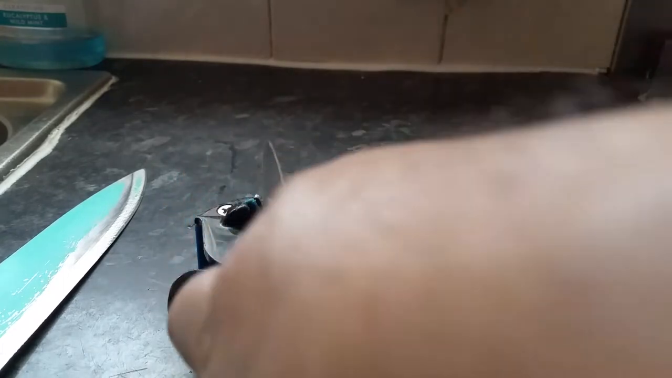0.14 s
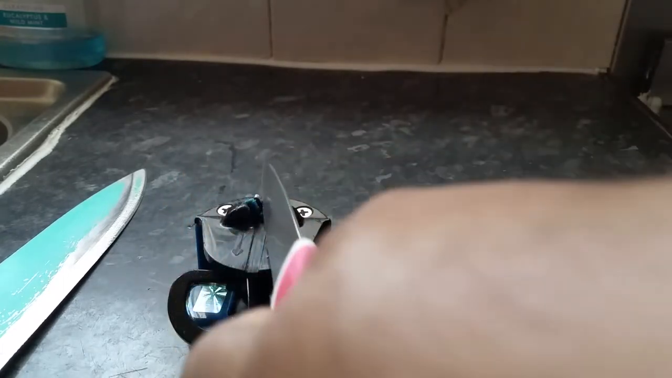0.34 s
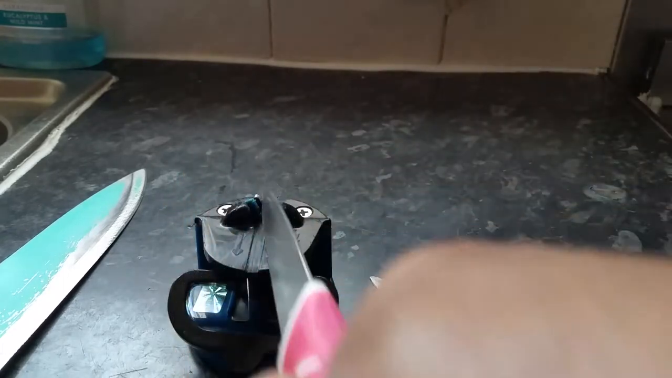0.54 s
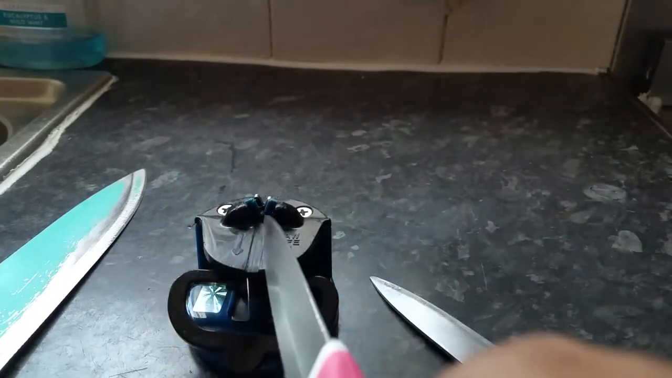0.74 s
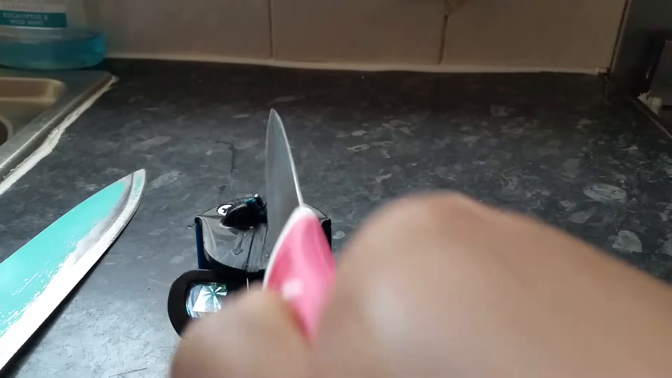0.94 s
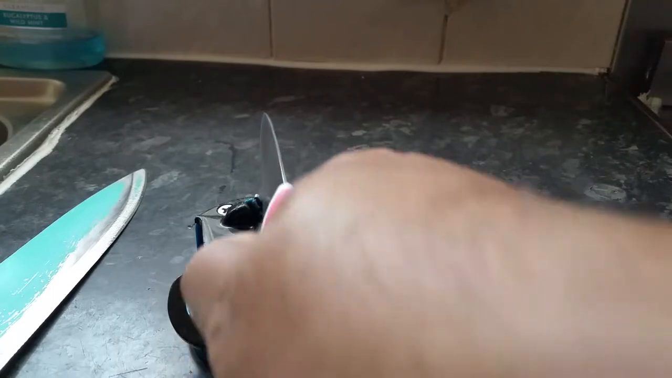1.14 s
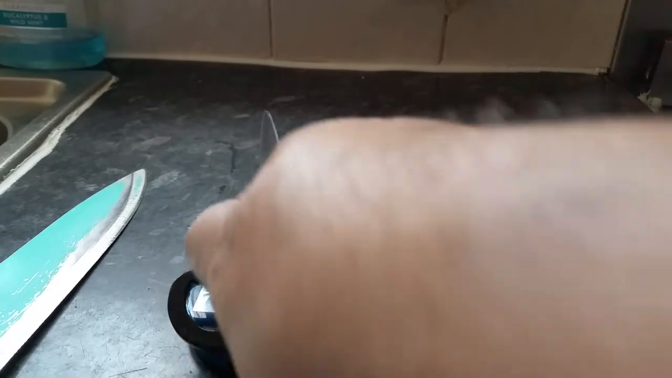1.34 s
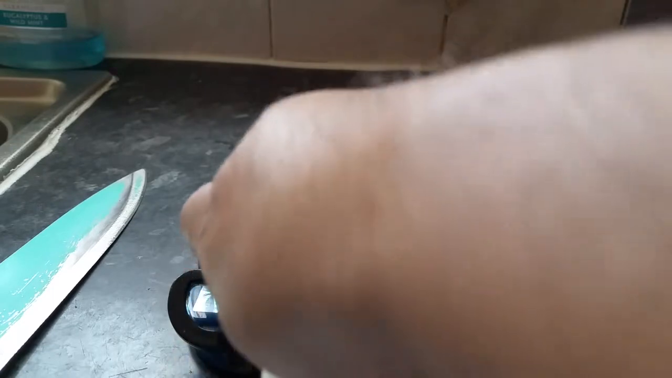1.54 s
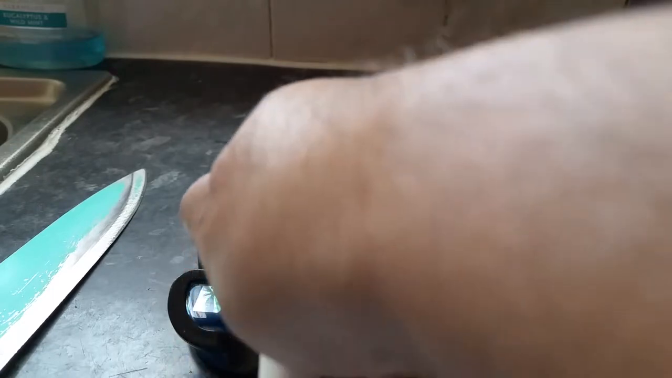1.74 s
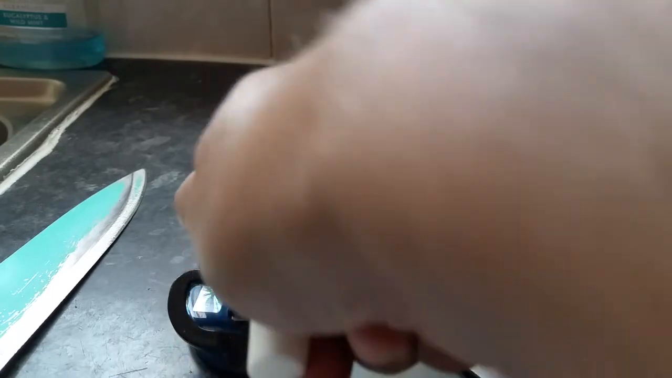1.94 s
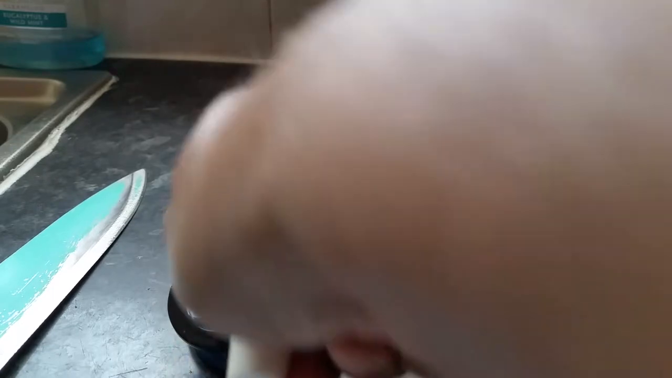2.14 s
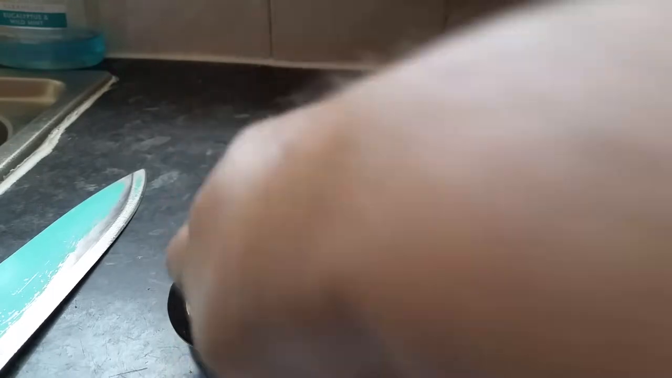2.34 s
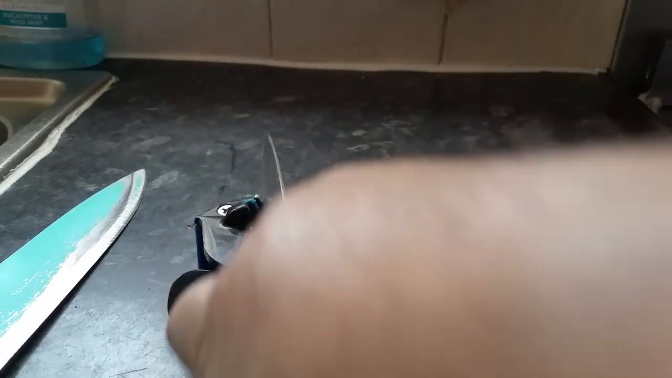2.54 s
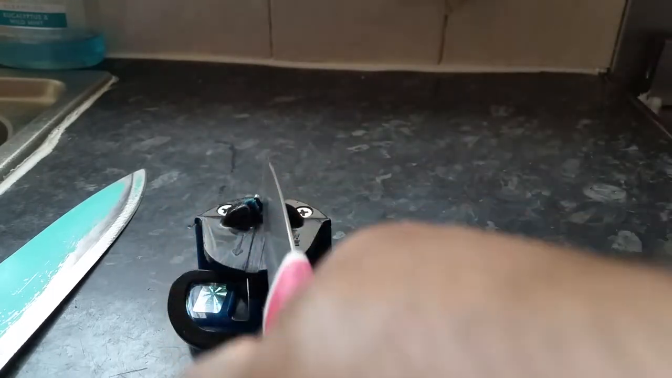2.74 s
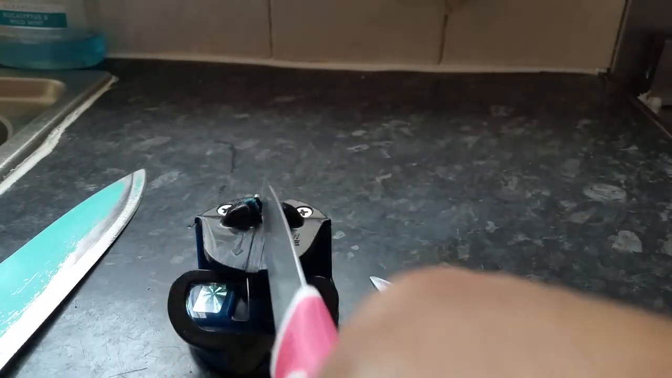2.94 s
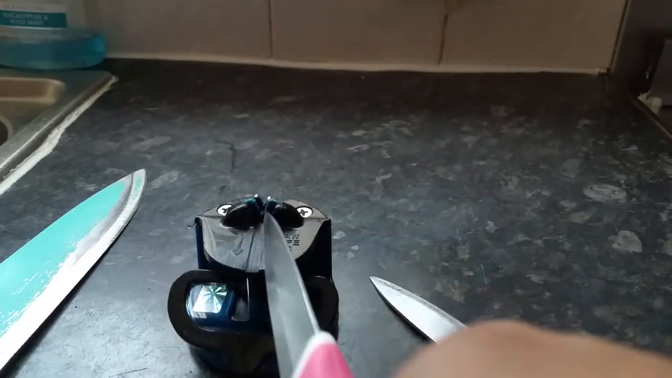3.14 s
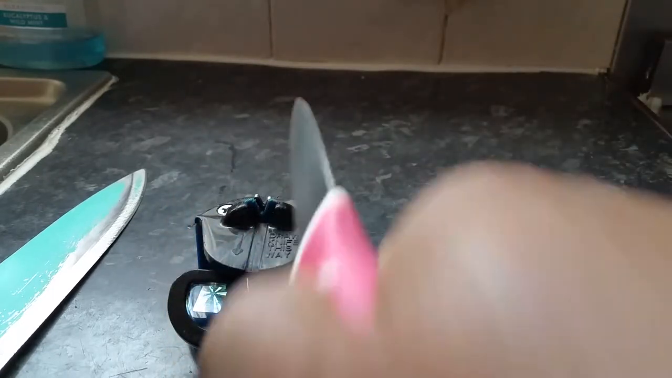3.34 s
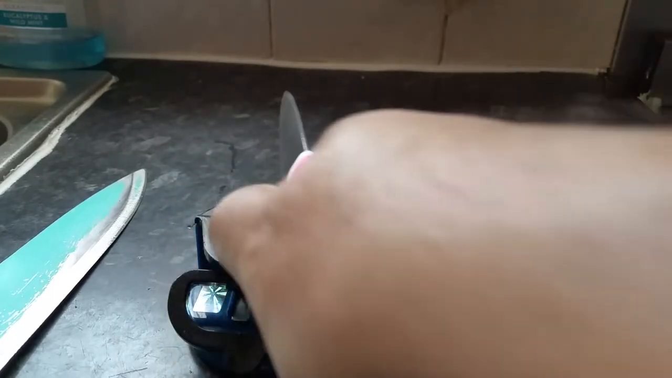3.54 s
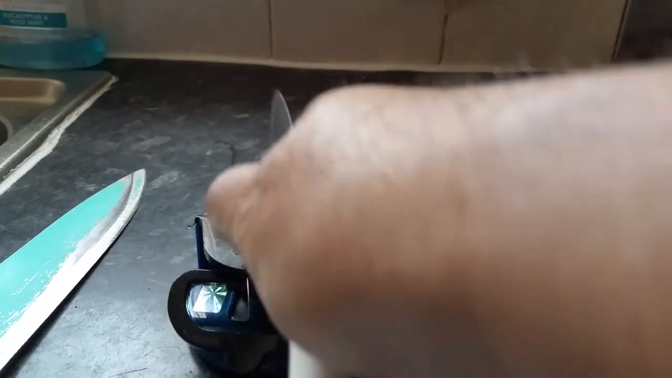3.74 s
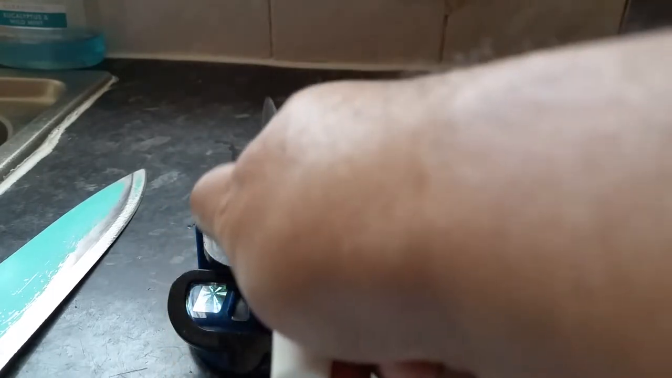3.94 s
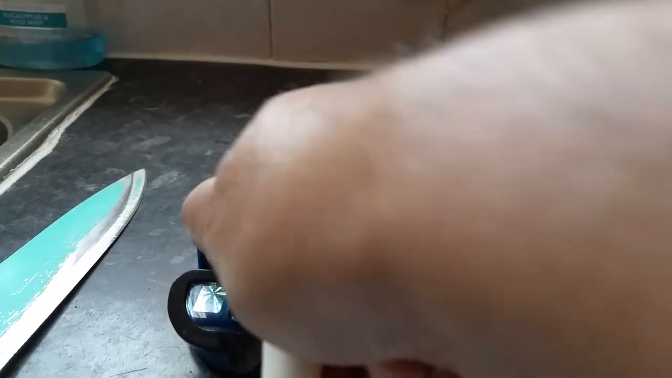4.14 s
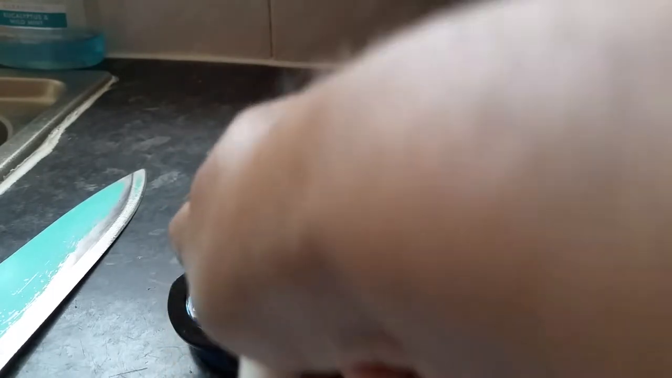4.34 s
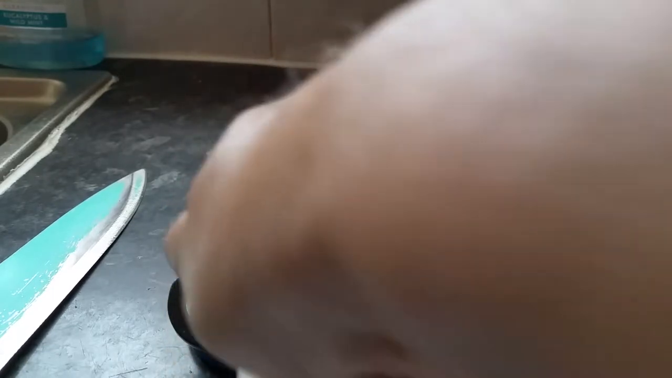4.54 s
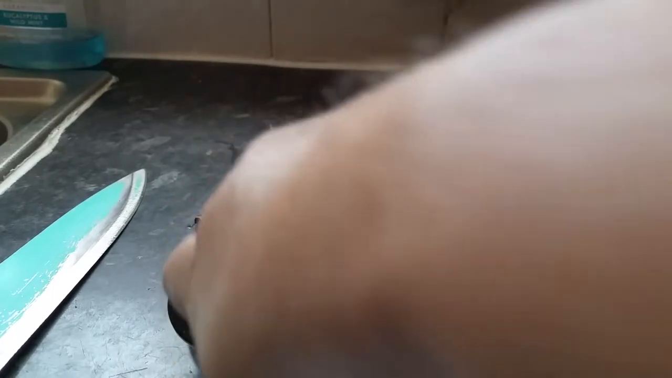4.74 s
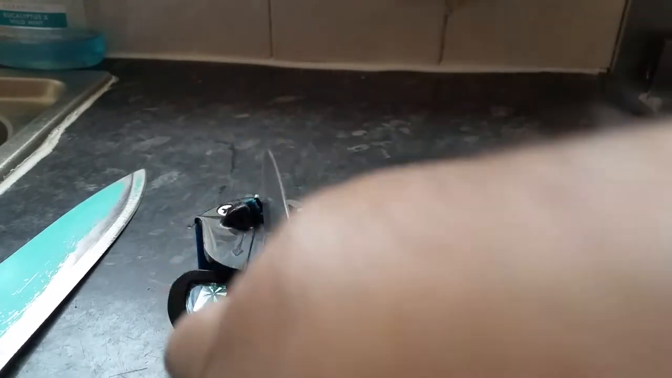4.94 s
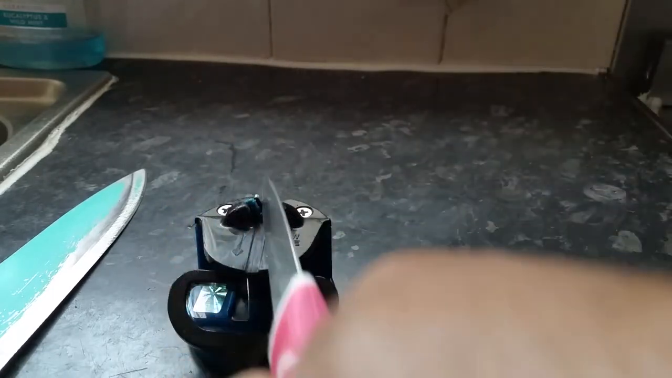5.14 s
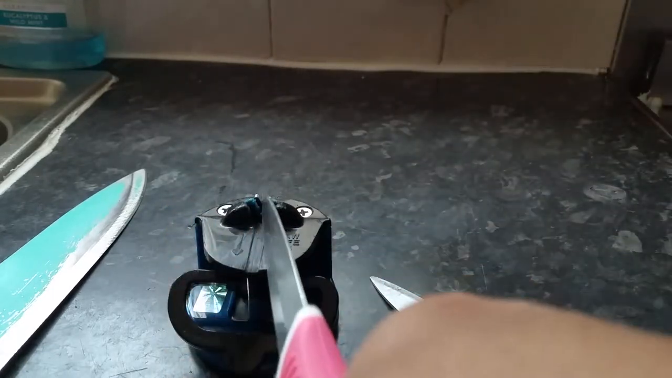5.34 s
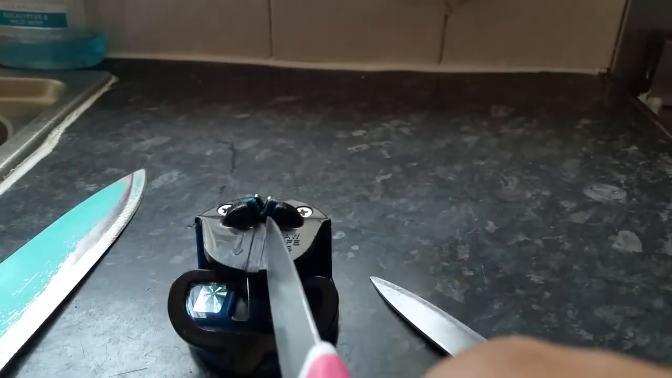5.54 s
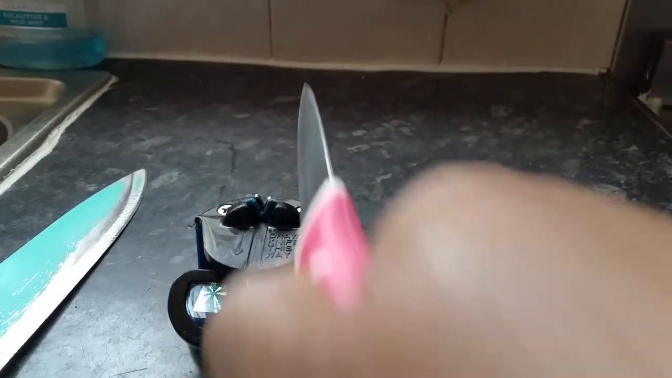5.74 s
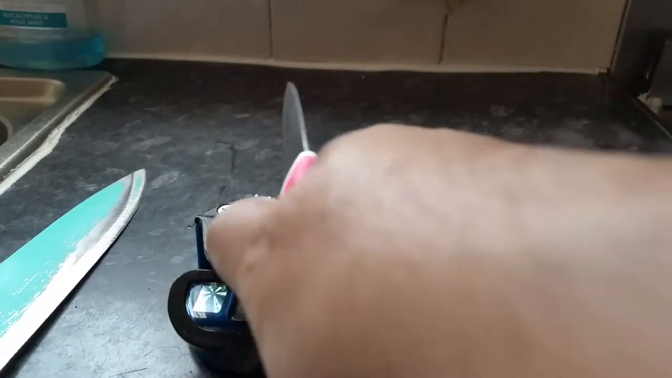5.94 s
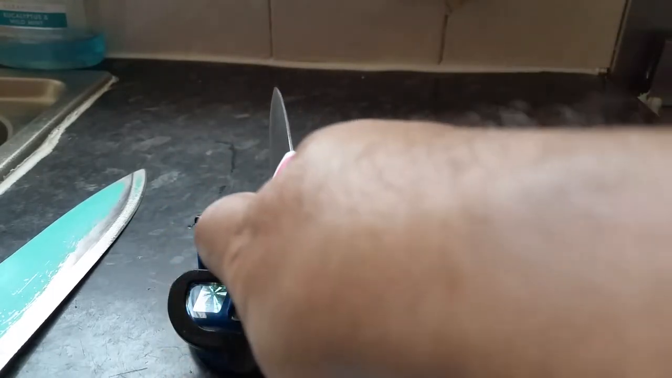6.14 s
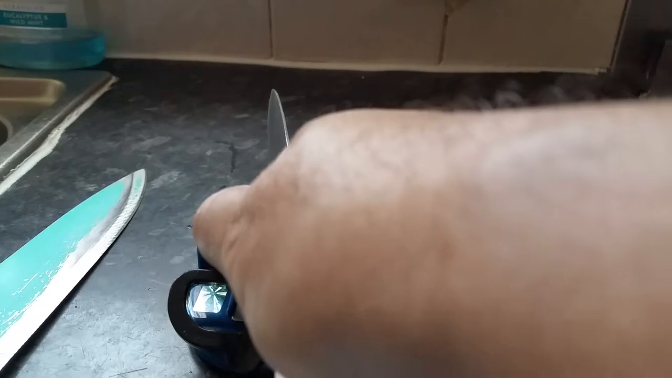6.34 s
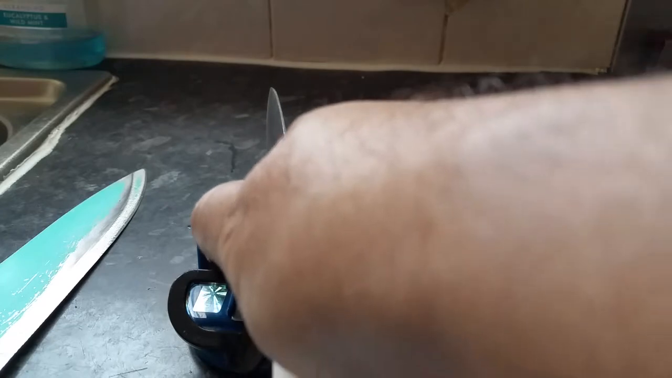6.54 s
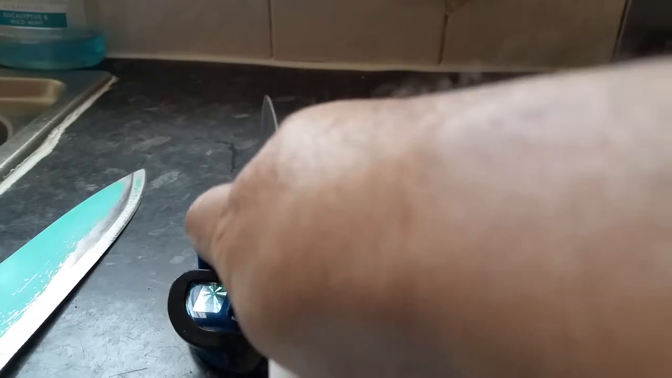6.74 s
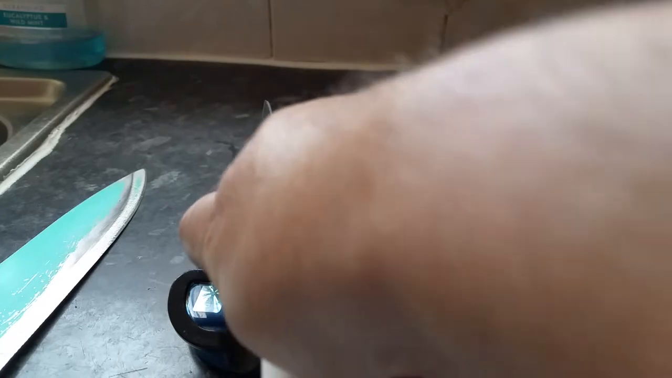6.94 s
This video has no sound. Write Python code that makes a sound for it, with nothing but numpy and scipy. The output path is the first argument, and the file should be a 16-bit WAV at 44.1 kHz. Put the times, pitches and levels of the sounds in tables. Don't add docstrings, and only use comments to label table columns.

```python
import sys
import numpy as np
from scipy import signal
from scipy.fft import rfft, irfft, next_fast_len
from scipy.io import wavfile
from scipy.ndimage import uniform_filter1d, map_coordinates

SR = 44100
rng = np.random.default_rng(int(sys.argv[2]) if len(sys.argv) > 2 else 0)


def level_to_linear(level):
    exponent = np.asarray(level, float) / 20
    return 10 ** exponent


def generate_wav(sig):
    pcm = np.round(np.clip(np.atleast_2d(sig).T, -1, 1) * 32767).astype(np.int16)
    wavfile.write(sys.argv[1], SR, pcm)


N = 308611

# f/Hz, width/Hz, level/dB
WORKTOP = [(65.5, 7.6, -2.5), (115, 27.7, 2), (173.4, 21.3, 2.5), (212.5, 23, -1.5), (306, 28, -2.5),
           (360.3, 94, -8.5)]
# t/s, blade rasp level/dB, load on the housing/dB
PULLS = [
    [(0.0, -33.5, 8.5), (0.014, -36.5, 1.5), (0.19, -39, 2.5), (0.25, -42.5, 0.5), (0.302, -36.5, 2.5),
     (0.498, -39.5, 1), (0.514, -37.5, 1.5), (0.652, -41.5, 1.5), (0.675, -41.5, 8)],
    [(2.35, -49.5, 7.5), (2.4, -32.5, 0.5), (2.452, -40, 3), (2.608, -34, 1), (3.048, -47, 1),
     (3.102, -39.5, 0), (3.122, -56.5, 10), (3.206, -66, 6), (3.25, -82, 5)],
    [(4.6, -40.5, 7), (4.764, -45, 3), (4.792, -37.5, 1), (4.948, -36, -0.5), (5.072, -38.5, 3),
     (5.082, -37, -1.5), (5.29, -41.5, 2), (5.358, -67.5, 16), (5.385, -68, 2.5)],
]


def unit(x):
    return x / np.sqrt(np.mean(x ** 2) + 1e-20)


def to_peak(x):
    return x / np.abs(x).max()


def along(points, hz):
    f, value = np.transpose(points)
    return np.interp(np.log(hz + 1), np.log(f + 1), value)


def wobble(rate):
    return map_coordinates(rng.standard_normal(N // 200), [np.arange(N) * rate / SR])


def filtered(x, response):
    size = next_fast_len(x.shape[-1] + 8192)
    hz = np.fft.rfftfreq(size, 1 / SR)
    return irfft(rfft(x, size) * response(hz), size)[..., :x.shape[-1]]


def resonances(peaks, turn=-1):
    def response(f):
        total = 0
        for k, (centre, width, db) in enumerate(peaks):
            damping = 1j * f * width
            total = total + turn ** k * level_to_linear(db) * damping / (centre ** 2 - f ** 2 + damping + 1e-9)
        return total
    return response


def grit(spread_db, clump_db, clump_rate):
    size_db = spread_db * np.minimum(rng.exponential(size=N), 5)
    grains = rng.standard_normal(N) * level_to_linear(size_db)
    return unit(grains * level_to_linear(clump_db * wobble(clump_rate)))


def contact(slides):
    rasp_db, load_db = np.full(N, -200.), np.zeros(N)
    for rows in slides:
        s, row_rasp_db, row_load_db = np.transpose(rows)
        touch = slice(round(s[0] * SR), round(s[-1] * SR))
        t = np.arange(N)[touch] / SR
        rasp_db[touch] = np.interp(t, s, row_rasp_db)
        load_db[touch] = np.interp(t, s, row_load_db)
    return uniform_filter1d(level_to_linear(rasp_db), size=200), uniform_filter1d(load_db, size=200)


def hum():
    # f/Hz, level per Hz/dB
    still = [(15, -55), (25, -25.5), (55, -3.5), (87, -12), (105, -7.5), (226, -7), (245, -19), (296, -6),
             (349, -24), (483, -16), (687, -27.5), (1010, -22), (1470, -27), (14000, -44.5), (16500, -43.5)]
    # f/Hz, width/Hz, level/dB
    fridge = [(300, 22, -5.5), (5400, 230, -30), (7600, 600, -38), (14500, 2600, -42)]
    # f/Hz, likeness (1 = the same)
    alike = [(60, .7), (400, 0.97), (2000, 0.098), (10000, 0.12)]

    def mid_and_side(hz):
        colour = level_to_linear(along(still, hz)) + np.abs(resonances(fridge)(hz))
        angle = np.arccos(np.clip(along(alike, hz), -1, 1)) / 2
        return colour * np.array([np.cos(angle), np.sin(angle)])

    mid, side = filtered(rng.standard_normal((2, N)), mid_and_side)
    level = level_to_linear(-59.5 + 0.77 * wobble(5.6))
    return level * np.array([mid + side, mid - side]) / np.std(mid)


def strokes():
    # f/Hz, width/Hz, level/dB
    blade_modes = [(1650, 260, -5), (2227, 170, -5), (2676, 120, -4.5), (3559, 140, -4), (4120, 260, -6.5),
                   (4704, 38, 0), (5176, 120, 3), (6284, 190, -3), (6430, 82, -9.5), (7480, 72, -21),
                   (8650, 170, -5.5), (9980, 110, -18.5), (10800, 480, -21), (12100, 210, -27.5)]
    # f/Hz, level per Hz/dB
    rasp_colour = [(710, -37.5), (1200, -2.5), (2010, -2), (3520, -10.5), (4430, -5.5), (5270, 1.5),
                   (15100, -23), (16000, -31.5), (16500, -70)]
    # f/Hz, width/Hz, level/dB
    housing = [(495, 81, 3), (581, 60, -3), (683, 65, 0.5), (749, 33, -3), (837, 58, 5), (919.3, 37, 5.5),
               (1087, 57, -2), (1180, 53, 1.5)]
    # start t/s, length/s, rasp level/dB, fade/dB, load/dB
    scuffs = [(1.19, .13, -41.5, 13.5, 6), (1.323, .1, -49.5, 7, 5.5), (1.45, .13, -55.5, 6.5, 5),
              (1.613, 0.082, -74, 5.5, 8), (1.771, 0.09, -54.5, 11.5, 1.5), (1.887, 0.13, -60.5, 16, 9),
              (2.164, 0.037, -56, -2, 2), (2.238, 0.024, -42.5, 9.5, 3), (2.285, 0.053, -59, -17.5, 8.5),
              (3.684, 0.045, -61, 12.5, 9), (3.764, 0.039, -73, -5, 5.5), (4.33, 0.058, -65, -18.5, 6.5),
              (4.397, .07, -56, 11, 10.5), (4.477, .085, -46.5, 20, 9), (5.401, 0.022, -46, 29.5, -2),
              (5.441, 0.022, -54, -2.5, -0.5), (5.47, .085, -64.5, 7, 1), (6.796, 0.081, -58.5, 10, 5),
              (6.877, .118, -77, 10.5, 8)]
    slides = PULLS + [[(s, db, load), (s + long, db - fade, load)] for s, long, db, fade, load in scuffs]
    rasp, load_db = contact(slides)
    grains = grit(spread_db=3.0, clump_db=2.1, clump_rate=240)
    ring = np.zeros(N)
    for k in range(3):
        ring += filtered(grains * level_to_linear(2.4 * wobble(22)), resonances(blade_modes[k::3]))
    hiss_grains = grit(spread_db=5.0, clump_db=0.5, clump_rate=130)
    hiss = filtered(hiss_grains, lambda hz: level_to_linear(along(rasp_colour, hz)))
    blade = unit(ring) + level_to_linear(-4.5) * unit(hiss)
    fine = filtered(blade, lambda hz: 1 / (1 + (4400 / (hz + 1)) ** 12))
    body = np.zeros(N)
    for k in range(2):
        body += filtered(grains * level_to_linear(1.3 * wobble(14)), resonances(housing[k::2]))
    sound = unit(blade - fine) + level_to_linear(0.4 - 0.88 * load_db) * unit(fine) + level_to_linear(load_db) * unit(body)
    return rasp * sound


def shake():
    # t/s, level/dB, time to die by 60 dB/s
    jolts = [(.05, -29.5, 1.1), (0.698, -34, 0.23), (1.191, -43.5, 1.4), (1.5, -45.5, 1.4),
             (1.6, -46.5, 0.34), (1.87, -37.5, 0.25), (2.219, -28, 0.46), (2.341, -29, 0.89),
             (3.12, -46.5, 0.64), (3.29, -53, 0.61), (3.68, -43.5, 0.99), (3.84, -52.5, 0.3),
             (4.071, -48, 0.5), (4.38, -29.5, 0.38), (4.578, -30.5, 0.68), (5.44, -52, 0.76),
             (6.2, -49, 0.485), (6.41, -55.5, 0.73), (6.86, -44.5, .5)]
    rise_s, rest_db = 0.073, -63
    t = np.arange(N) / SR
    rasp, load_db = contact(PULLS)
    power = (rasp * level_to_linear(0.96 * load_db)) ** 2 + level_to_linear(rest_db) ** 2
    for s, db, t60 in jolts:
        fall = np.maximum((t - s) / t60, (s - t) / rise_s)
        power += level_to_linear(db - 60 * fall) ** 2
    return np.sqrt(power)


def worktop():
    drag = grit(spread_db=-0.5, clump_db=1.5, clump_rate=47)

    def board(f):
        bass_loss = (1j * f / (45 + 1j * f)) ** 2
        return resonances(WORKTOP)(f) * bass_loss

    return shake() * unit(filtered(drag, board))


def contacts():
    # t/s, steel click level/dB, housing relative/dB, thud relative/dB
    seats = [
        (0.176, -12.5, -28, -9),
        (2.2201, -10, -8, -21),
        (2.3294, -5, -5, -9),
        (4.0736, -27, -4.5, -2),
        (4.3785, -7.5, -2.5, -16),
        (4.578, -5, -0.5, -3),
        (6.8615, -24.5, -1.5, -28),
    ]
    # t/s, steel click level/dB, housing relative/dB, chatter/dB
    ticks = [
        (0.6835, -9, -13, -10),
        (1.185, -20.5, -8, -0.5),
        (1.5912, -26.5, -7, 2),
        (1.8676, -20, -8.5, -4),
        (3.268, -21.5, -13, 0),
        (4.356, -33, -3.5, -7),
        (5.3949, -27, -4.5, 7),
        (5.6311, -48.5, 0, 8),
        (6.8032, -25.5, -21, -12),
    ]
    # t/s, steel click level/dB, housing relative/dB, thud relative/dB
    bumps = [(0.818, -35, -5, -3), (1.4525, -39.5, -11, 8), (2.1763, -44, 8, -8), (2.188, -30.5, -3, 8.5),
             (2.2147, -28, 4, -11), (2.2385, -27.5, 4, 14), (2.2498, -27.5, 7, -3), (2.7225, -29, -3, -18),
             (3.682, -40.5, 7, 18.5), (3.753, -50.5, 8.5, -4), (4.045, -55, 3, 0), (4.6513, -25, -9, 10.5),
             (4.7873, -24, -20, -3), (5.4045, -23, -20.5, -0.5), (6.2025, -53, 0, 19)]
    knocks_in = [(s, db, shell, thud, -21, -10.5) for s, db, shell, thud in seats]
    slips = [(s, db, shell, -23, -12, chatter) for s, db, shell, chatter in ticks]
    touches = [(s, db, shell, thud, -12, -16.5) for s, db, shell, thud in bumps]
    return sorted(knocks_in + slips + touches)


def knocks():
    # f/Hz, width/Hz, level/dB
    steel = [(1380, 320, -4.5), (2180, 550, -2), (2970, 400, -3.5), (3150, 390, -2.5), (4360, 1800, -10)]
    # f/Hz, width/Hz, level/dB
    snap = [(5220, 1400, -10), (6330, 860, -4.5), (8120, 600, -6), (11100, 5200, -16), (14840, 1100, -19.5)]
    # f/Hz, width/Hz, level/dB
    struck = [(480, 260, -7), (640, 300, 0), (880, 450, -4), (1350, 650, -5)]
    out, t = np.zeros(N + SR), np.arange(SR // 8) / SR
    for s, db, housing_db, thud_db, crack_db, chatter_db in contacts():
        noise = rng.standard_normal((3, len(t)))
        onset = 1 - np.exp(-t / 0.00063)
        fade = level_to_linear(-60 * t / 0.011) + level_to_linear(chatter_db - 4.5 - 60 * t / 0.036)
        blow = noise[:2] * onset * fade
        shove = t / .0003 * np.exp(1 - t / .0003)
        push = level_to_linear(chatter_db - 60 * t / .1) * noise[2] - shove
        click = to_peak(filtered(blow[0], resonances(steel)))
        crack = to_peak(filtered(blow[1], resonances(snap)))
        hollow = to_peak(filtered(push, lambda f: resonances(struck, turn=1)(f) ** 2))
        thud = to_peak(filtered(push, resonances(WORKTOP, turn=1)))
        sound = click + level_to_linear(crack_db + 9.5) * crack
        sound += level_to_linear(housing_db + 9) * hollow + level_to_linear(thud_db + 1.5) * thud
        start = round((s - .0007) * SR)
        out[start:start + len(t)] += level_to_linear(db - 7.5) * sound
    return out[:N]


def shivers():
    # t/s, level/dB, f/Hz, width/Hz, time to die by 60 dB/s
    taps = [(.6835, -13, 3300, 1700, .12), (.686, -28, 3500, 900, .5), (.684, -40, 8100, 1200, .35),
            (.686, -24, 790, 2300, .5), (1.592, -32, 1400, 900, .1), (3.268, -30, 2500, 1200, .25),
            (5.632, -39, 2600, 800, .08), (6.804, -36, 2150, 700, .3), (6.861, -30, 1900, 1100, .45),
            (3.27, -43, 1140, 450, .9), (6.861, -26, 1000, 1000, .4), (2.329, -10, 590, 260, .3),
            (2.22, -17, 600, 300, .2), (4.378, -9, 600, 420, .4), (4.38, -35, 1200, 600, .3),
            (4.569, -41, 5200, 1300, .06), (4.578, -12, 680, 360, .25), (1.89, -31, 380, 300, .6),
            (4.073, -31, 330, 300, .4), (3.685, -46, 5100, 1200, .25), (3.69, -30, 280, 300, .9),
            (3.3, -31, 330, 300, .33), (1.2, -29, 300, 200, 1.5), (6.201, -40, 380, 350, .4)]
    out, t = np.zeros(N + SR), np.arange(SR // 2) / SR
    for s, db, hz, width, t60 in taps:
        mode = resonances([(hz, width, 0)])
        band = unit(filtered(rng.standard_normal(len(t)), lambda f: mode(f) ** 3))
        fade = level_to_linear(-60 * t / .014) + level_to_linear(-19 - 60 * t / t60)
        start = round(s * SR)
        out[start:start + len(t)] += level_to_linear(db) * band * fade
    return out[:N]


def ports(x):
    # f/Hz, phase/rad
    lead = [(60, 0.5), (400, -0.96), (600, 1.37), (1120, 0.56), (2240, 1), (3530, 0.84), (4310, -2.1),
            (5500, 0.46), (8270, 1.72), (9730, -0.3), (10600, -2.1), (12500, -2), (15100, -2.5)]
    # f/Hz, level/dB
    tilt = [(60, 0.5), (110, 5), (200, 3), (380, 2), (700, 2.5), (1290, -0.5), (2380, 2), (4400, 6.5),
            (8120, 8), (15000, 8.5)]

    def left_and_right(hz):
        half = level_to_linear(along(tilt, hz) / 2) * np.exp(.5j * along(lead, hz))
        return np.array([half, 1 / half])

    return filtered(x, left_and_right)


def kitchen(x):
    # f/Hz, time to die by 60 dB/s
    decay = [(150, 0.79), (600, 0.42), (3000, 0.28), (8000, 0.34), (14000, 0.36)]
    hz, t, z = signal.stft(rng.standard_normal((2, SR // 2)), SR, nperseg=256)
    fade = level_to_linear(-60 * t / along(decay, hz)[:, None])
    tail = signal.istft(z * fade, SR, nperseg=256)[1]
    airborne = filtered(np.pad(x, (150, 0)), lambda f: 1j * f / (220 + 1j * f))
    return signal.fftconvolve(airborne[None], tail / np.linalg.norm(tail[0]), axes=1)[:, :N]


def scene():
    rub = strokes() + worktop()
    knock = knocks() + shivers()
    echo = kitchen(level_to_linear(-7) * rub + level_to_linear(-8.0) * knock)
    return ports(rub + knock) + echo + hum()


def roll_off(x):
    return signal.sosfilt(signal.butter(12, 16670, fs=SR, output="sos"), x)


def record(dry):
    limited = filtered(dry, lambda hz: hz < 15850)
    return roll_off(limited)


dry = scene()
out = record(dry)
generate_wav(out)
```